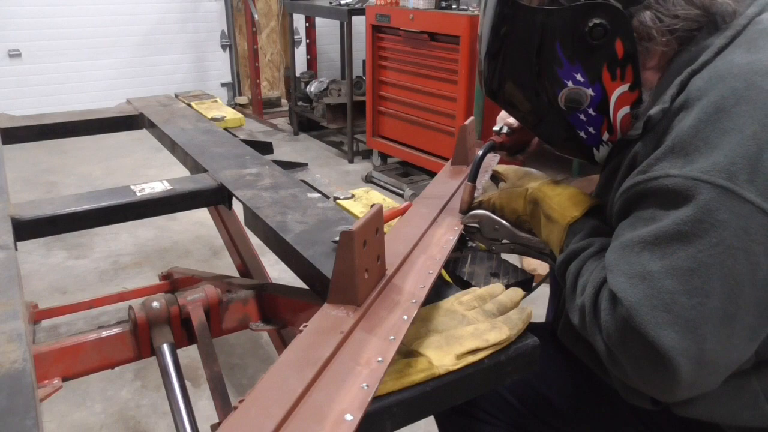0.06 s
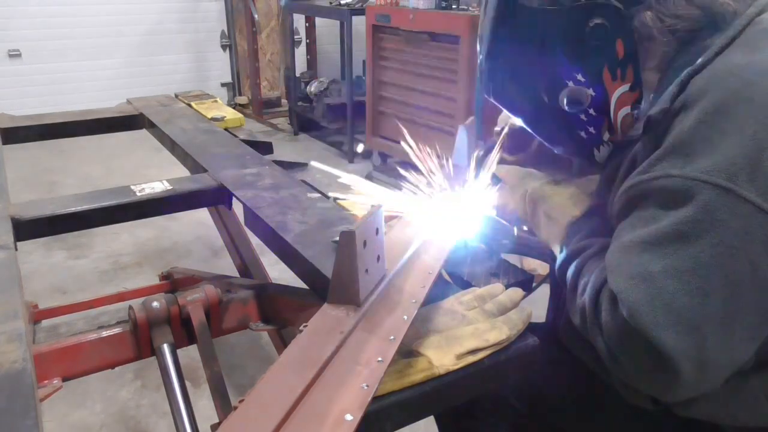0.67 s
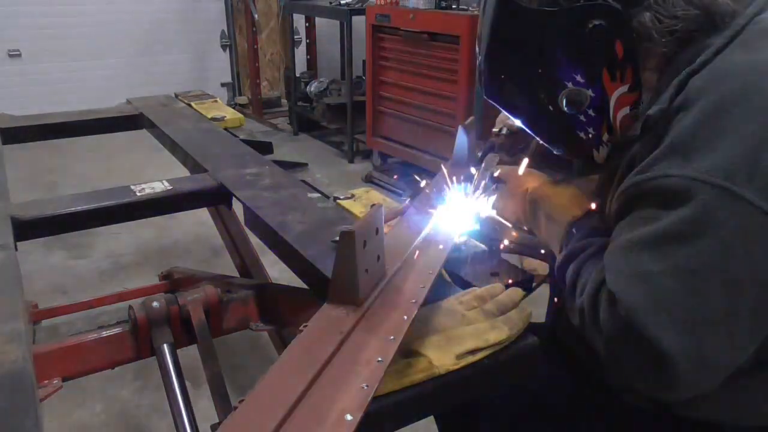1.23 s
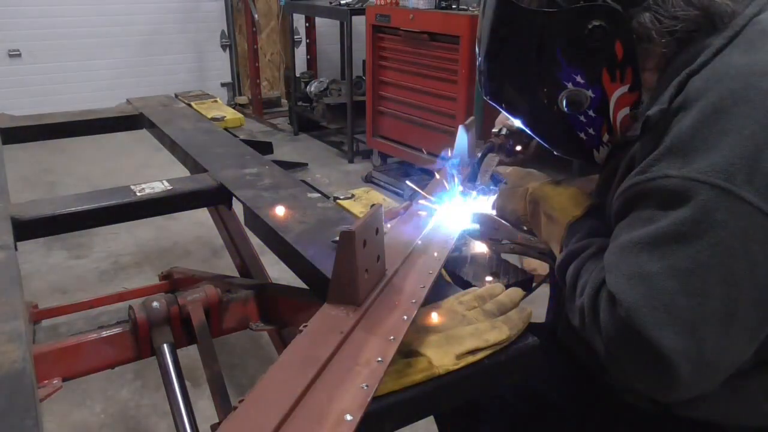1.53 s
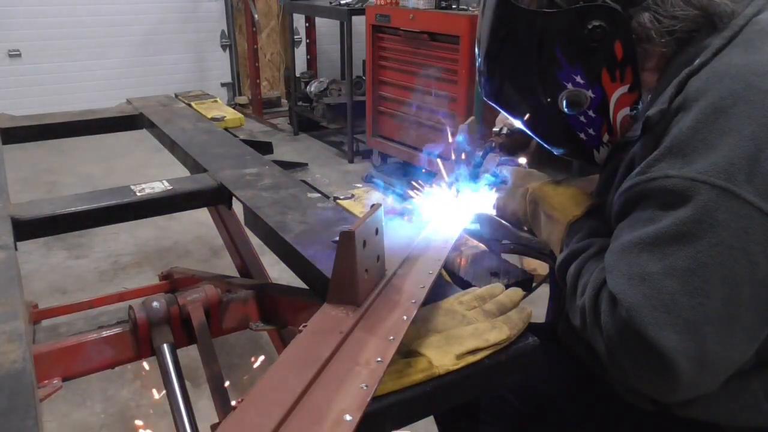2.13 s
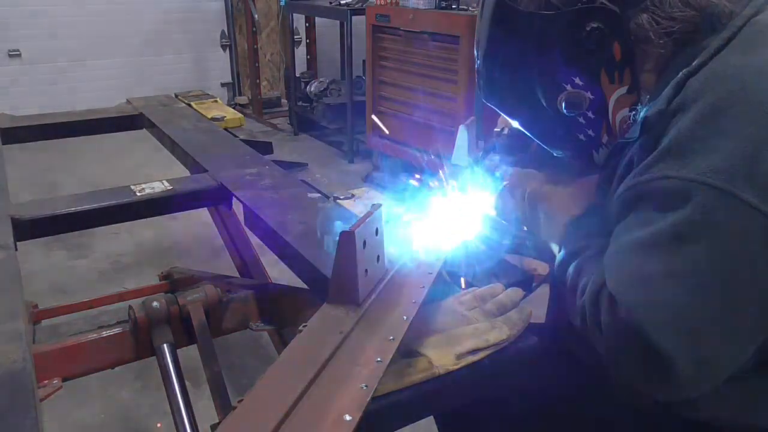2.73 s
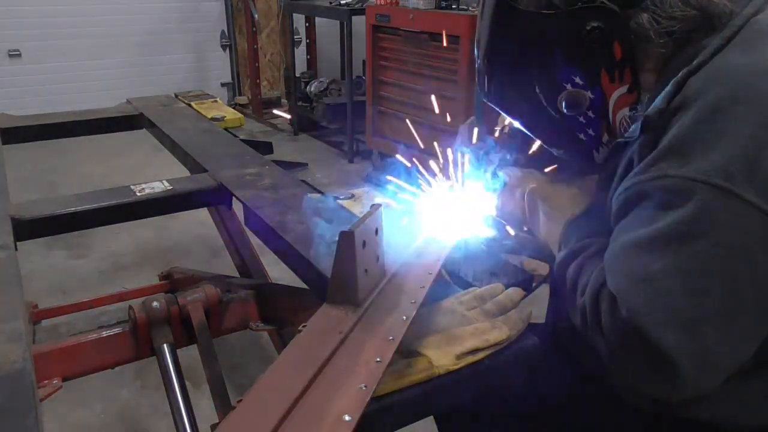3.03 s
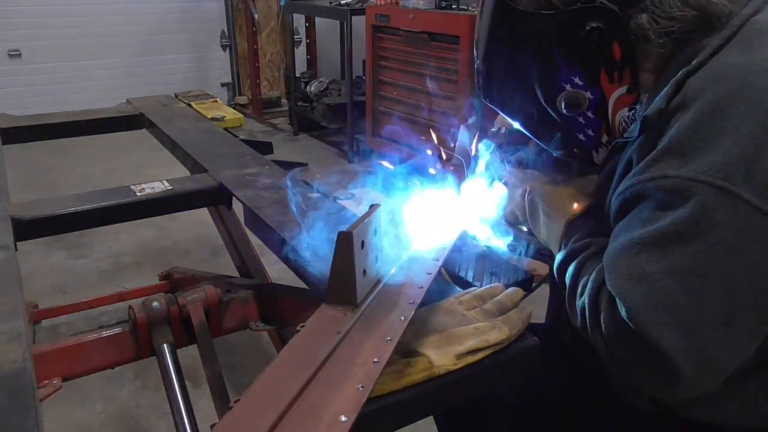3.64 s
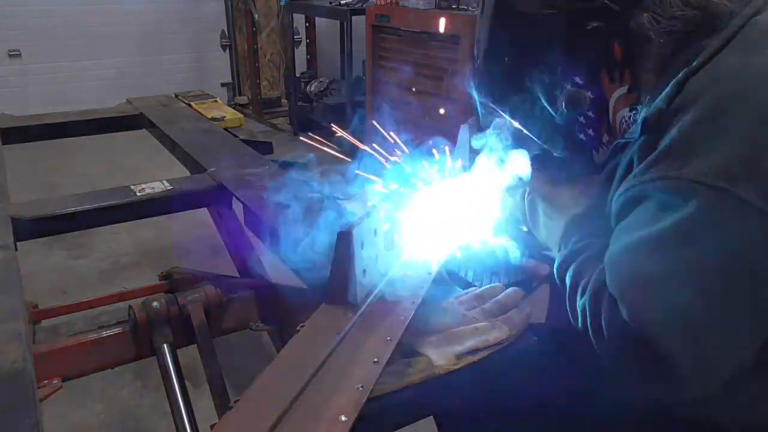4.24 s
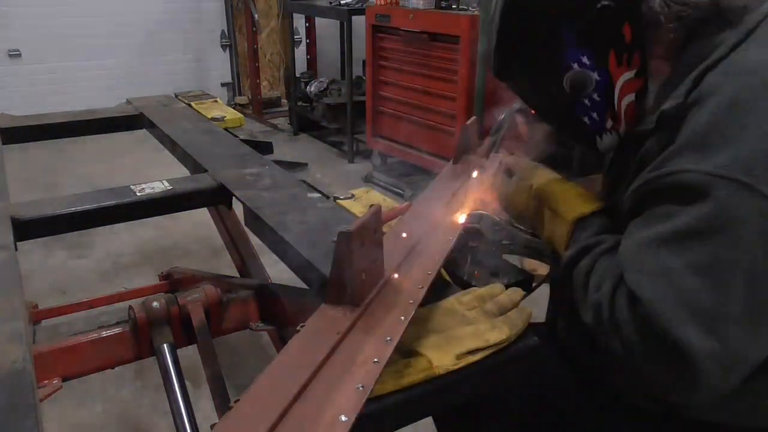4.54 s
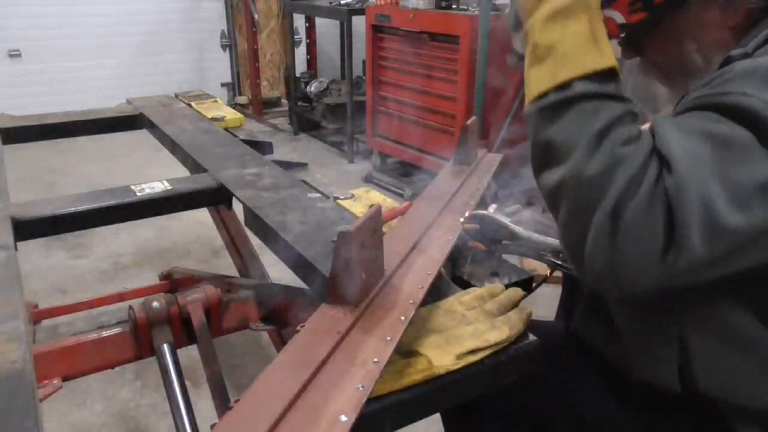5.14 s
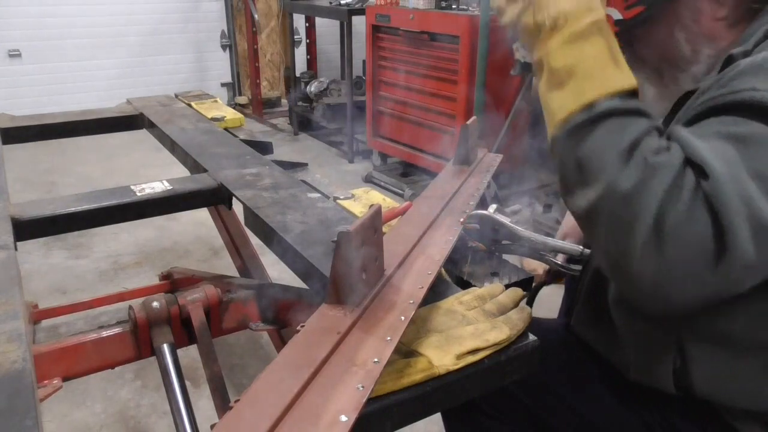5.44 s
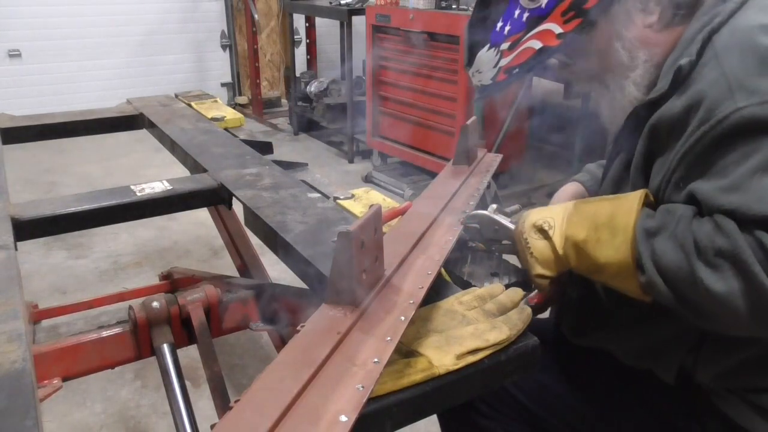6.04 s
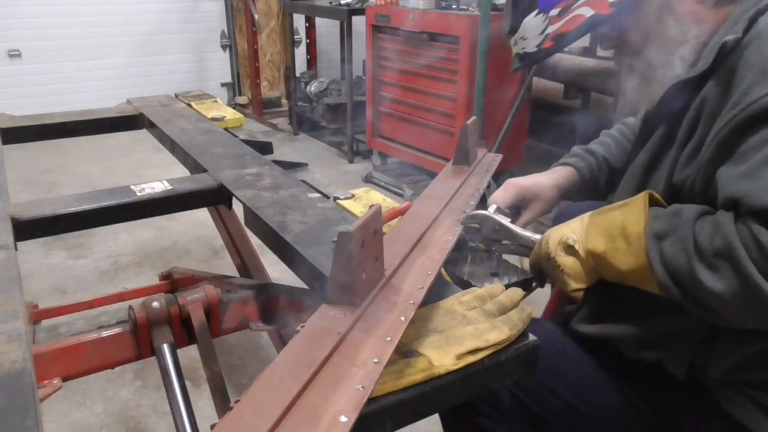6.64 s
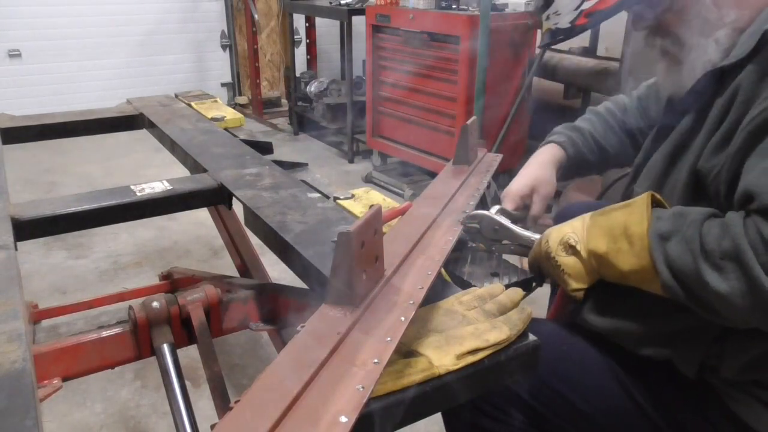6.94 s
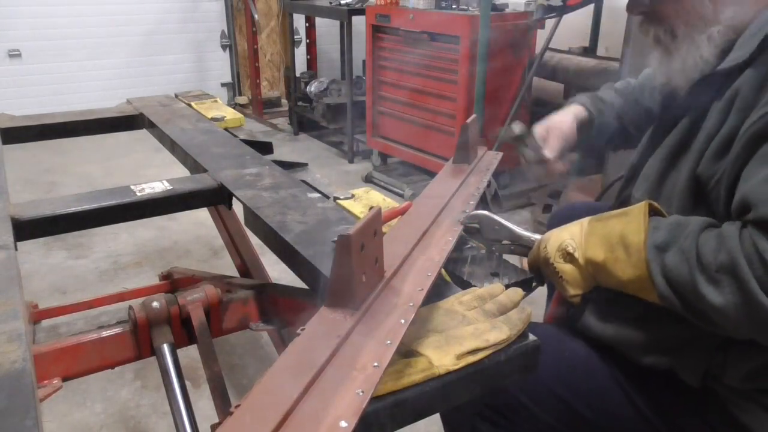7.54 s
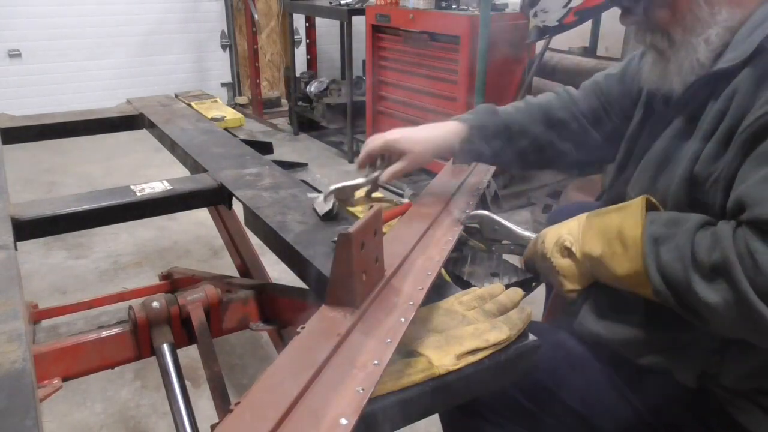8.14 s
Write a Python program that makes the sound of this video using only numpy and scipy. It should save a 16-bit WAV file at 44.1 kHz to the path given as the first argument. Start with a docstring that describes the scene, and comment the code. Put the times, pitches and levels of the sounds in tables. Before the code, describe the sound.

A torch clicks, gas hisses and a welding arc pops and sizzles, then a metal clamp snaps open and clanks down over a fan hum.

```python
"""A fan hums in a workshop; a sleeve rustles, a torch clicks and shielding gas hisses from its nozzle. Close to
the stereo microphone, a wire-feed welder strikes on a steel beam with a few loud pops, then sizzles as the wire
shorts into the pool some 100-200 times a second. Afterwards a locking clamp is snapped open and a wrench is put
down on the steel frame. The recorder's gain ducks under the arc and creeps back."""
import sys
import numpy as np
from scipy import signal
from scipy.fft import rfft, irfft, next_fast_len
from scipy.io import wavfile
from scipy.ndimage import uniform_filter1d

SR = 44100
rng = np.random.default_rng(int(sys.argv[2]) if len(sys.argv) > 2 else 0)


def materialize(psi):
    """Save the field psi as 16-bit PCM at rate SR to the path in sys.argv[1].

    A 1-D psi becomes a single channel; in a 2-D psi each row is a channel.
    """
    bounded = np.clip(np.atleast_2d(psi).T, -1, 1)
    quanta = np.round(bounded * 32767).astype(np.int16)
    wavfile.write(sys.argv[1], SR, quanta)


N = 365588
TIME = np.arange(N) / SR
GRID_HZ = np.maximum(np.fft.rfftfreq(4096, 1 / SR), 1)
SIDES = np.array([[1], [-1]])   # left, right

# Fan and motor lines. Each row: frequency in Hz, rms level in dB, phase wander in radians.
FAN_LINES = [(189.5, -44.5, 1.86), (220.8, -30.5, 0.13), (293.6, -45.5, 1.3), (330.8, -48, 1.2),
             (441, -50, 1.2), (717, -53, 2.7), (897, -57.5, 0.85), (1110, -55, 0.64), (1294, -58.5, 2.2)]
# How alike the room's air is left and right. Each row: frequency in Hz, likeness from 0 to 1.
AIR_LIKENESS = [(30, 0.4), (150, 1), (300, 0.89), (600, 0.7), (1200, 0.5), (3000, 0.64), (8000, 0),
                (15000, 0)]
# Noise spectra. Each row: frequency in Hz, relative level in dB.
AIR_COLOUR = [(25, -36), (70, -32), (105, -13), (130, -13), (180, -0.5), (260, -6.5), (400, -11),
              (600, -11.5), (1250, -18), (1800, -26), (4000, -31.5), (6000, -39), (7700, -35),
              (11000, -40.5), (15500, -51.5)]
CLOTH_COLOUR = [(40, -24.5), (200, 22), (400, 12.5), (1000, 1.5), (2500, -1), (4500, 2.5), (6000, -2),
                (7600, 1), (11000, -11.5), (15000, -26)]
SNAP_COLOUR = [(200, -28), (800, -19.5), (2600, -7.5), (3500, 4), (5000, -0.5), (7400, 1), (8500, 2.5),
               (10200, 1.5), (12000, -3), (14000, -6), (16000, -16.5)]
BOOM_COLOUR = [(20, -51), (100, -18.5), (200, -15), (370, -4.5), (500, 10), (850, -0.5), (1350, -0.5),
               (1750, -5), (2400, -8), (4000, -16), (8000, -41.5)]
GAS_COLOUR = [(300, -27.5), (560, -6.5), (705, 9.5), (920, -14.5), (1150, -0.5), (1400, -4.5), (1600, -1),
              (1850, -10.5), (2800, -15.5), (4500, -4.5), (6500, -8.5), (8300, 8), (9500, -4.5), (11700, 6),
              (13500, -4), (16000, -15)]
WHOOSH_COLOUR = [(300, -24), (750, -12), (980, -6), (1250, -19), (2000, -32), (6000, -45)]
ARC_SPREAD_COLOUR = [(150, -19), (700, -5.5), (1300, -8), (1900, -19.5), (2800, -12), (4000, -7.5),
                     (6000, -7), (7600, 1), (10200, 0.5), (13000, -6), (15500, -12.5)]   # the arc as it spreads in all directions
# Sleeve and glove moving. Each row: middle in seconds, half length in seconds, level in dB.
ARM_MOVES = [(0.217, 0.16, -49.5), (5.452, 0.42, -54.5), (5.645, 0.043, -49.5), (5.98, 0.18, -54),
             (7.102, 0.27, -55), (7.73, 0.075, -47.5)]
# Helmet and torch being handled. Each row: middle in seconds, pitch in Hz, level in dB.
BUMPS = [(5.36, 338, -37), (5.43, 462, -40), (5.635, 346, -39), (5.77, 335, -35.5), (7.30, 458, -40)]
# Modes of the struck parts. Each row: frequency in Hz, level in dB, t60 in seconds.
FRAME_MODES = [(486.3, 6, 0.18), (530, -6.5, .1), (610, -5, 0.25), (749, -2, 0.32), (879, -5.5, 0.1),
               (1110, -3, .15), (1176, -5, .15), (1293, -5.5, .12), (1370, -3, 0.11), (1477, -10, .08),
               (1580, -6, .09), (1890, -16, 0.12), (2420, -13, .14), (2499, -13, 0.18), (3520, -10.5, .17),
               (3828, -13, .2), (3966, -13, .17), (4120, -2.5, 0.092), (4420, -11, .09), (5350, -16, .25)]
TOOL_MODES = [(4200, -19.5, .03), (7300, -8, .012), (7620, -12.5, .028), (9000, 0, .011), (8922, -15, .12),
              (9116, -34, .12), (9900, -6.5, .015), (10594, -17, .2), (11020, -10, .015),
              (12170, -12.5, .018), (12700, -16, .017), (12938, -25, .12), (13000, -14, .15)]
JAW_MODES = [(7160, -14, .1), (7200, 2, 0.014), (7340, -13, .13), (7500, -12, .13), (7420, -14, .1),
             (7820, -1, .012), (7862, -11, .12), (8146, -9, .08), (8508, -13, .1)]
LEVER_MODES = [(526, -15, .08), (654, -11, 0.24), (976, -5.5, 0.14), (1220, 0.5, 0.12), (1355, 5.5, 0.049),
               (1410, -2, .083), (1640, -1, 0.054), (3630, -3, .04), (4900, -11.5, .04), (7200, -12, 0.046),
               (7900, -14, .06)]
SPRING_MODES = [(2660, -16, 0.18), (3057, -1.5, 0.23), (3280, -10, .14), (3670, -1, 0.12),
                (4500, -10, 0.11), (4750, -1, .12), (5566, -9, .14), (6310, 0, 0.23), (7060, -2, 0.15),
                (7500, -2, 0.098), (7640, -4, 0.14), (8478, -8, .11), (9300, -4, .12), (9740, -3, .11),
                (10140, 4, 0.091), (10800, -3, 0.078), (11455, -6, .11)]
TORCH_MODES = [(695, -14.5, 0.18), (1118, -12, .06), (1323, -3.5, 0.044), (1620, 0.5, .09),
               (1810, -7.5, 0.031), (2050, -4, 0.077), (2184, -2.5, 0.05), (2600, -4.5, .05)]
# Hits on those parts. Each row: start in seconds, level in dB.
JAW_CHINKS = [(8.1708, -5.5), (8.178, -6.5), (8.213, -18), (8.254, -27)]
LEVER_KNOCKS = [(6.929, -28.5), (6.938, -43), (6.962, -49)]
SPRING_RELEASES = [(7.137, -34), (7.1407, -30), (7.147, -41)]
TORCH_CLICKS = [(.281, -30), (0.289, -30)]
# The lever under strain. Each row: time in seconds, pitch in Hz, level in dB.
LEVER_GROAN = [(6.98, 328, -70), (7.02, 341, -37), (7.075, 367, -41.5), (7.115, 360, -38), (7.15, 345, -76)]
# Knocks and snaps of steel: the torch valve opening, the clamp, and the tool meeting the frame. Each row: #
# start in seconds, relative levels of boom, frame ring, tool ring and snap in dB, snap t60 in seconds, # lower
# and upper edge of the frame modes moved in Hz.
CONTACTS = [(.281, -35, -35, -50.5, -29, .055, 600, 4000), (5.134, -76, -75, -70, -45, .04, 1500, 4000),
            (6.93, -37.5, -44, -70, -42, 0.038, 600, 4000), (7.137, -34.5, -37, -23, -22, 0.13, 1200, 5000),
            (7.158, -35, -39, -50.5, -49, .17, 500, 3000), (7.498, -78, -70, -35, -58, .041, 1490, 4000),
            (7.516, -73, -70, -29.5, -52, .025, 1490, 4000),
            (8.1027, -18, -17.5, -24, -28, 0.0094, 280, 2980),
            (8.1038, -19, -21, -2, -24, 0.0091, 900, 4800), (8.107, -21, -17.5, -29, -40, .011, 280, 2000),
            (8.122, -29, -24, -19, -19, 0.038, 900, 3000), (8.1705, -21, -22, -0.5, -16, .012, 400, 2500),
            (8.178, -35, -26, -4, -11, .008, 400, 4000), (8.211, -28, -13.5, -11, -10.5, 0.056, 900, 4800),
            (8.2156, -26, -15.5, -22, -23, .04, 910, 4800), (8.226, -34, -28, -30, -28, .03, 900, 2000),
            (8.278, -33, -44, -18, -37, .04, 700, 4000)]
# Hiss and thump with the opening pops. Each row: start in seconds, hiss in dB, its fall in dB a
# second, thump in dB.
OPENING_TAILS = [(0.531, -17.5, 111, -38), (0.747, -15, 38, -27)]
# Lone loud pops. Each row: start in seconds, level in dB, seconds for which the molten drop grows.
LOUD_POPS = [(0.509, -19.5, .0023), (0.5176, -6, .009), (0.5199, -5, .001), (0.5364, 4.5, .018),
             (.7621, 3, 0.0071), (0.8137, 1.5, .03), (.8305, 5.5, .017), (0.8808, 3, .05),
             (.9139, 0.5, .01), (.9243, 3, .011), (0.9358, 2, .011), (.9472, 3, .012), (.9581, 2.5, .011),
             (.9690, 3, .011), (.9788, 4, .009), (1.0114, 2, .004), (1.023, 4, .005), (1.0293, 7, .006),
             (1.0834, 3, .004), (1.096, 5.5, 0.0063), (1.1629, 4, 0.0055), (1.17, 4.5, .006),
             (1.1965, 5.5, 0.0066), (1.2167, 0, .005), (1.252, 1.5, 0.012), (1.2786, -1, 0.027),
             (1.2888, 2.5, .01), (1.3194, -15, .034), (1.3366, -5, .006), (1.3819, -2, 0.0058),
             (1.4023, -2, 0.0046), (1.4656, 3.5, 0.0036), (1.4853, -10, 0.016), (1.5295, 1, .01),
             (1.5417, 1.5, .006), (1.5744, -1.5, 0.0054), (1.638, 1, 0.025), (1.6823, -1, 0.0044),
             (1.7106, -0.5, 0.0051), (1.745, 1.5, 0.0042), (1.768, -1, 0.0045), (1.8337, -1, .005),
             (1.8682, 1, .014), (1.8903, 1.5, 0.0066), (1.946, -1, .006), (1.951, 3, .005),
             (1.9946, 0.5, 0.0052), (2.1126, -1.5, 0.0046), (2.1679, -1, .005), (2.2433, -3.5, .005),
             (2.2513, 0, .005), (2.3369, -6, 0.0056), (2.4386, -8, 0.0043), (2.48, -4.5, .006),
             (2.4972, -6, .006), (2.559, -3.5, .005), (2.5909, -1.5, .006), (2.666, 0, 0.018),
             (2.6749, -2, 0.005), (2.7135, -2, .007), (2.8025, -3, .006), (2.8192, 0, .007),
             (2.885, -1.5, 0.0094), (2.9126, 0, .008), (2.9712, -2, .008), (3.003, -3, 0.011),
             (3.0407, -0.5, .044), (3.0722, -9, .04), (3.0902, -9, .002), (3.0934, -0.5, .0027),
             (3.125, -1, .019), (3.145, -5, .006), (3.1554, -10, .006), (3.1637, -2, 0.0046),
             (3.1725, -3, 0.0051), (3.1812, -3, .004), (3.1957, -2.5, 0.01), (3.2207, -12, .006),
             (3.2506, -4, 0.0082), (3.2652, -6, 0.0067), (3.3049, -6, 0.0092), (3.3195, -2.5, .012),
             (3.368, -3, .0027), (3.4226, -4, .005), (3.4535, -3.5, .006), (3.514, -1.5, .005),
             (3.6161, -3, 0.016), (3.7228, -3, 0.0055), (3.8473, -9, .008), (3.8886, -3, .012),
             (3.9062, -3, 0.014), (3.9363, -6, .01), (3.9631, -4, 0.022), (3.9867, -2.5, 0.017),
             (4.016, 3, 0.0086), (4.0396, 3, 0.0082), (4.146, -6.5, 0.0043), (4.181, -3, 0.0089),
             (4.2073, -4.5, 0.012), (4.222, -6, .014), (4.235, -5, .013), (4.2722, -11, .037),
             (4.2817, -10, .009), (4.2848, -5.5, .003), (4.2961, -3, .01), (4.3089, -2, .01),
             (4.3228, -4.5, .01), (4.3373, -1, .012), (4.3513, 1.5, .012)]
# The wire dipping into the pool. Each row: time in seconds, short circuits a second.
DIP_PACE = [(.95, 180), (1.17, 160), (1.3, 130), (1.4, 175), (1.53, 135), (1.72, 185), (2.1, 215),
            (2.5, 200), (2.62, 160), (2.82, 165), (3.04, 125), (3.15, 135), (3.35, 115), (3.55, 190),
            (3.8, 170), (3.95, 130), (4.14, 155), (4.3, 115)]
# The torch along the joint. Each row: time in seconds, arc level in dB, lift of its low peaks in dB.
TORCH_TRAVEL = [(.9, -1, 1.5), (1.15, -1, 1), (1.35, -4.5, 0.5), (1.9, -8.5, -0.5), (2.5, -11, 1.5),
                (3.0, -7.5, 0), (3.16, -2.5, 2), (3.3, -9, 3), (3.5, -8, 1), (3.75, -9.5, 2),
                (4.05, -7.5, 1.5), (4.35, -14, 1.5)]
# Resonances of nozzle, beam and microphone. Each row: frequency in Hz, width in Hz, relative level
# in dB at the start of the bead and at its end.
ARC_PEAKS = [(440, 1200, -22.5, -17.5), (1295, 520, -12.5, -11), (2200, 620, -20, -21.5),
             (3770, 930, -15.5, -17), (4650, 1730, -15.5, -18), (7140, 520, -3.5, -7.5),
             (7810, 750, 0.5, 0), (8470, 630, -2, -0.5), (10080, 700, 2, -0.5), (10730, 750, 2.5, -0.5),
             (11650, 700, -16, 0), (12680, 860, 4, 5), (13400, 1000, -4.5, 0), (14340, 1600, -3.5, 1),
             (15500, 1900, -15.5, -15)]
# Stereo lean of the arc's treble. Each row: frequency in Hz, left minus right in dB.
ARC_BALANCE = [(6000, 0), (6800, -1.8), (7700, 0), (9300, .5), (10200, -6), (11200, -3), (12200, -1.5),
               (13100, 0), (13900, -1.7), (15500, 3.5)]
# The arc's arrival at the microphone. Each row: frequency in Hz, lead of the left side in radians.
ARC_LEAD = [(300, 0), (4000, 0), (6400, -.3), (7000, -.1), (8500, -.35), (9250, 1.9), (10000, 0),
            (13500, -.15), (14600, .15)]

SETTLED_S, FALTERS_S, OUT_S = .91, 4.2, 4.355   # the arc settles into short circuits, falters, goes out


def from_db(db):
    """Decibels to gain."""
    return 10 ** (np.asarray(db) / 20)


def in_time(rows):
    """The columns of a curve at every sample."""
    times, *columns = np.transpose(rows)
    return [np.interp(TIME, times, column) for column in columns]


def at_hz(points, hz=GRID_HZ):
    """Read a spectrum on a log-frequency axis."""
    knots_hz, values = np.transpose(points)
    return np.interp(np.log(hz), np.log(knots_hz), values)


def swell(middle_s, half_s, t=TIME):
    """A bell curve that peaks at 1."""
    return np.exp(-((t - middle_s) / half_s) ** 2)


def drift(per_s):
    """Random wander with a spread of about 1."""
    knots = rng.standard_normal(int(per_s * N / SR) + 2)
    return np.interp(TIME * per_s, np.arange(len(knots)), knots)


def add(track, s, sound):
    """Mix a sound into a track at time s."""
    i = int(np.clip(round(s * SR), 0, N - 1))
    track[..., i:i + sound.shape[-1]] += sound[..., :N - i]


def colour(x, gain):
    """Minimum-phase filter with this gain curve, scaled to unit energy."""
    cepstrum = irfft(np.log(gain + 1e-6))
    half = len(cepstrum) // 2
    cepstrum[1:half] *= 2
    cepstrum[half + 1:] = 0
    impulse = irfft(np.exp(rfft(cepstrum)))[:half]
    return signal.oaconvolve(x, impulse / np.linalg.norm(impulse))[:N]


def tint(pair, gain):
    """The same colour on both channels."""
    return np.array([colour(channel, gain) for channel in pair])


def high_pass(x, hz):
    """Second-order bass cut."""
    return signal.sosfilt(signal.butter(2, hz, "high", fs=SR, output="sos"), x)


def noise(spectrum):
    """Coloured noise of rms 1."""
    return colour(rng.standard_normal(N), from_db(at_hz(spectrum)))


def stereo_noise(spectrum, width):
    """Coloured noise; width is the part that differs left and right."""
    return noise(spectrum) + width * noise(spectrum) * SIDES


def burst(t60, width, size=1024):
    """Stereo white noise that falls 60 dB in t60 seconds."""
    mid, side = rng.standard_normal((2, size))
    return (mid + width * side * SIDES) * from_db(-60 * np.arange(size) / SR / t60)


def struck(modes, hits, scatter_db, pan_db, lowest_hz=0, highest_hz=SR, travel_s=.001):
    """Each hit rings every mode with its own strength; soft blows miss the highs, light ones the lows."""
    out = np.zeros((2, N))
    times, hits_db = np.transpose(hits)
    starts = (times * SR).astype(int)
    for hz, db, t60 in modes:
        delay = int(rng.random() * travel_s * SR)   # each mode takes its own path to the microphone
        strengths = from_db(hits_db + db + scatter_db * rng.standard_normal(len(starts)))
        rolloff = 1 + (hz / highest_hz) ** 4 + (lowest_hz / hz) ** 4
        clicks = np.full(N, 1e-18)
        clicks[np.minimum(starts + delay, N - 1)] = strengths / rolloff
        radius, angle = from_db(-60 / (t60 * SR)), 2 * np.pi * hz / SR
        ring = signal.lfilter([0, np.sin(angle)], [1, -2 * radius * np.cos(angle), radius ** 2], clicks)
        out += ring * from_db(pan_db * rng.standard_normal() * SIDES)
    return out


def sink(db, db_per_s):
    """Follow every rise at once, fall no faster than this."""
    return np.maximum.accumulate(db + db_per_s * TIME) - db_per_s * TIME


def lag(x, seconds):
    """One-pole smoothing."""
    pole = np.exp(-1 / (seconds * SR))
    return signal.lfilter([1 - pole], [1, -pole], x)


def fan(air_db=-37.5, waver_db=2.0, side_radians=0.16):
    """Room tone: a steady hum with weaker, less steady lines, in the rush of moving air."""
    hum = 0
    for hz, db, wander in FAN_LINES:
        phase = 2 * np.pi * hz * TIME + wander * drift(14)
        rms = from_db(db + waver_db * min(wander, 1) * drift(7.7))
        hum = hum + rms * np.sqrt(2) * np.sin(phase - side_radians * SIDES)
    size = next_fast_len(N)
    bins_hz = np.maximum(np.fft.rfftfreq(size, 1 / SR), 1)
    alike = np.clip(at_hz(AIR_LIKENESS, bins_hz), 0, 1)
    mid, side = rfft(rng.standard_normal((2, size))) * from_db(at_hz(AIR_COLOUR, bins_hz))
    air = irfft(np.sqrt(1 + alike) * mid + np.sqrt(1 - alike) * side * SIDES)[:, :N]
    return hum * from_db(-.7 * SIDES) + from_db(air_db) * air / np.sqrt(np.mean(air ** 2))


def echoes(pair, decay, apart_hz=4500):
    """Reflections as decaying noise of unit energy; left and right share the lows, not the treble."""
    mid, side = rng.standard_normal((2, SR))
    tails = [decay(white, np.arange(SR) / SR) for white in mid + high_pass(side, apart_hz) * SIDES]
    return np.array([signal.oaconvolve(channel, tail / np.linalg.norm(tail))[:N]
                     for channel, tail in zip(pair, tails)])


def workshop(pair, tail_db=-8.0, split_hz=6000, low_t60=0.54, treble_t60=0.4):
    """The room's tail, whose treble dies first."""
    low_pass = signal.butter(2, split_hz, fs=SR, output="sos")

    def decay(white, t):
        low = signal.sosfiltfilt(low_pass, white)
        tail = low * from_db(-60 * t / low_t60) + (white - low) * from_db(-60 * t / treble_t60)
        return tail * (t > .005)
    return from_db(tail_db) * echoes(pair, decay)


def near_reflections(pair, db=-7.0, t60=0.029):
    """Quick reflections from the beam and the welder, close by."""
    return from_db(db) * echoes(pair, lambda white, t: white * from_db(-60 * t / t60) * (t > .0008))


def clothing():
    """Each movement of the arm is a rustle that swells and fades."""
    power = sum(from_db(db) ** 2 * swell(s, half_s) for s, half_s, db in ARM_MOVES)
    return np.sqrt(power) * stereo_noise(CLOTH_COLOUR, width=0.93)


def bumps(half_s=0.031):
    """Each soft bump of helmet or torch is a brief hollow tone."""
    return sum(from_db(db) * swell(s, half_s) * np.sqrt(2) * np.sin(2 * np.pi * hz * TIME)
               for s, hz, db in BUMPS)


def clamp_opening():
    """The lever knocks as the hand takes hold, groans as it is pressed, and the spring lets go."""
    hz, db = in_time(LEVER_GROAN)
    pressed = (TIME > LEVER_GROAN[0][0]) & (TIME < LEVER_GROAN[-1][0])
    groan = pressed * from_db(db) * np.sqrt(2) * np.sin(2 * np.pi * np.cumsum(hz) / SR)
    lever = struck(LEVER_MODES, LEVER_KNOCKS, scatter_db=3.5, pan_db=-2.0)
    spring = struck(SPRING_MODES, SPRING_RELEASES, scatter_db=2.0, pan_db=-1.0)
    return lever + groan + spring


def clinks(boom_lift_db=6.0, jangle_db=-24, tool_trim_db=-1.0):
    """Steel on steel: a snap, the frame's boom and ring, the tool's jangle, jaws chinking on a bounce."""
    boom, snap = np.zeros((2, 2, N))
    for s, boom_db, _, ring_db, snap_db, snap_t60, _, _ in CONTACTS:
        add(boom, s, from_db(boom_db + boom_lift_db) * burst(t60=0.22, width=0.089, size=SR))
        add(snap, s, from_db(snap_db) * burst(snap_t60, width=0.25, size=SR))
        add(snap, s, from_db(ring_db + jangle_db) * burst(t60=0.56, width=0.25, size=SR))
    times, _, frame_db, tool_db, _, _, lowest_hz, highest_hz = np.transpose(CONTACTS)
    frame = struck(FRAME_MODES, np.c_[times, frame_db], scatter_db=1.5, pan_db=3.0,
                   lowest_hz=lowest_hz, highest_hz=highest_hz, travel_s=.005)
    frame = high_pass(frame, hz=280)   # the frame's ring carries no bass
    tool = struck(TOOL_MODES, np.c_[times, tool_db + tool_trim_db], scatter_db=3.5, pan_db=0.5)
    jaws = struck(JAW_MODES, JAW_CHINKS, scatter_db=1.0, pan_db=1.5)
    snap = tint(snap, from_db(at_hz(SNAP_COLOUR)))
    boom = tint(boom, from_db(at_hz(BOOM_COLOUR)))
    return snap + boom + frame + tool + jaws


def trigger():
    """The torch clicks twice as trigger and wire feed engage."""
    return struck(TORCH_MODES, TORCH_CLICKS, scatter_db=2.0, pan_db=2.0)


def gas(open_s=.28, shut_s=4.31, attack_s=.0015, surge_s=.21, surge_db=-24.5, flow_db=-33.5):
    """Pressure stored in the hose escapes in a surge, then the nozzle hisses until the valve shuts."""
    age = np.maximum(TIME - open_s, 0)
    open_db = flow_db + (surge_db - flow_db) * np.exp(-age / surge_s)
    release_db = 193 * np.maximum(TIME - shut_s, 0)   # 193 dB a second
    gain = np.minimum(age / attack_s, 1) * from_db(open_db - release_db)
    return gain * stereo_noise(GAS_COLOUR, width=0.15)


def whoosh(middle_s=3.325, half_s=.035, db=-30):
    """A short hollow whoosh from the boiling pool."""
    return from_db(db) * swell(middle_s, half_s) * noise(WHOOSH_COLOUR)


def thumps(top_hz=450):
    """A dull low thump goes with the opening pops."""
    out = np.full((2, N), 1e-18)
    for s, _, _, db in OPENING_TAILS:
        add(out, s, from_db(db) * burst(t60=0.16, width=0.35, size=8192))
    return tint(out, 1 / (1 + (GRID_HZ / top_hz) ** 2))


def fading_hiss(attack_s=0.0019):
    """A bright hiss dies away after the first loud pops; another fades as the arc catches."""
    gain = 0
    for s, db, fall_db_per_s, _ in OPENING_TAILS:
        age = np.maximum(TIME - s, 0)
        gain = gain + np.minimum(age / attack_s, 1) * from_db(db - fall_db_per_s * age)
    return gain * (TIME < SETTLED_S) * stereo_noise(ARC_SPREAD_COLOUR, width=0.35)


def pop(s, sputter, width, stretch=1, spike=3.84, crack_t60=0.0024, sputter_t60=0.013):
    """The wire's molten bridge bursts: a pressure spike, a short crack, then sputter."""
    boil = 1 + 2.6 * swell(middle_s=3.29, half_s=0.17, t=s)   # cracks last longer while the pool boils
    out = burst(crack_t60 * boil * stretch, width) + sputter * burst(sputter_t60, width)
    out[:, 0] = spike
    return out / np.linalg.norm(out[0]) * np.sqrt(SR / 1000)   # the energy of 1 ms at rms 1


def short_circuits(lift_db=1.0, spread_db=1.7, jitter=.2, width=0.097,
                   hiss_db=-16.0, hiss_db_per_octave=13, stall_db=-5, flutter_db=3.5):
    """Cracks come unevenly and pause while a big drop grows; the plasma hisses more at a quicker pace."""
    per_s, = in_time(DIP_PACE)
    level_db, _ = in_time(TORCH_TRAVEL)
    cracks = np.zeros((2, N))
    dipping = TIME < FALTERS_S
    for s, db, growth_s in LOUD_POPS:
        stretch = from_db(0.31 * max(db, 0))   # big drops take longer to burst
        add(cracks, s, from_db(db + lift_db) * pop(s, sputter=0.125, width=width, stretch=stretch))
        dipping[int((s - .8 * growth_s) * SR):int((s + .003) * SR)] = False
    s = SETTLED_S
    for gap, size, spatter in rng.standard_normal((650, 3)):
        i = int(min(s, OUT_S) * SR)
        crack = pop(s, sputter=0.25 * np.exp(spatter / 2), width=width)
        if dipping[i]:
            add(cracks, s, from_db(level_db[i] + lift_db + spread_db * np.clip(size, -2, 2)) * crack)
        s += np.exp(jitter * gap) / per_s[i]
    pace_db = hiss_db_per_octave * np.log2(per_s / np.mean(per_s))
    plasma_db = level_db + hiss_db + pace_db + stall_db * ~dipping + flutter_db * drift(400)
    burning = (TIME >= SETTLED_S) & (TIME < OUT_S)
    return cracks, burning * from_db(plasma_db) * burst(np.inf, width, size=N)


def resonances(peaks):
    """Gain curve of a set of broad peaks."""
    gains = [from_db(db) / (1 + (2 * (GRID_HZ - hz) / width) ** 2) for hz, width, db in peaks]
    return np.sqrt(sum(gain ** 2 for gain in gains))


def arc(cracks, plasma, low_db=-16.5, low_hiss_db=5.5, low_cut_hz=150):
    """The arc heard directly, coloured by nozzle and beam; the colour shifts as the torch travels."""
    _, fullness_db = in_time(TORCH_TRAVEL)
    travel = np.clip((TIME - SETTLED_S) / (OUT_S - SETTLED_S), 0, 1)
    lean = from_db(at_hz(ARC_BALANCE) / 2)
    left, right = cracks + plasma
    # the plasma is duller than the cracks
    low_drive = from_db(low_db + fullness_db) * (cracks + from_db(low_hiss_db) * plasma)
    out = 0
    for column, share in enumerate((1 - travel, travel)):
        peaks = [(hz, width, db[column]) for hz, width, *db in ARC_PEAKS]
        body = resonances(peaks[:5]) / (1 + (low_cut_hz / GRID_HZ) ** 2)   # a small arc has little bass
        bright = resonances(peaks[5:])
        treble = np.array([colour(left, bright * lean), colour(right, bright / lean)])
        out = out + share * (tint(low_drive, body) + treble * from_db(-.8 * SIDES))
    return out


def at_microphone(pair):
    """The arc reaches the two sides of the microphone slightly out of step."""
    size = next_fast_len(N)
    lead = np.interp(np.fft.rfftfreq(size, 1 / SR), *np.transpose(ARC_LEAD))
    return irfft(rfft(pair, size) * np.exp(.5j * lead * SIDES), size)[:, :N]


def scene(arc_room_db=-3.5):
    """Torch and tools sound close by and echo in the room; clothing, bumps and fan are added dry."""
    cracks, plasma = short_circuits()
    torch_and_tools = fading_hiss() + thumps() + whoosh() + gas() + trigger() + clamp_opening() + clinks()
    direct = at_microphone(arc(cracks, plasma)) + torch_and_tools
    arc_spread = from_db(arc_room_db) * tint(cracks + plasma, from_db(at_hz(ARC_SPREAD_COLOUR)))
    into_room = arc_spread + torch_and_tools
    return direct + near_reflections(into_room) + workshop(into_room) + clothing() + bumps() + fan()


def record(dry, threshold_db=-21.5, slope=0.82, attack_s=0.0029, cutoff_hz=16000):
    """The recorder's gain ducks on a peak, returning fast after a lone one, slowly after long noise."""
    power = np.abs(uniform_filter1d(np.mean(dry ** 2, axis=0), size=44))
    over_db = np.maximum(10 * np.log10(power + 1e-12) - threshold_db, 0)
    quick_db = sink(slope * over_db, db_per_s=52.0)
    slow_db = sink(lag(quick_db, seconds=0.3), db_per_s=14.0)
    duck_db = lag(np.maximum(quick_db, slow_db), attack_s)
    rounded = np.tanh(dry * from_db(-duck_db))
    return signal.sosfilt(signal.ellip(10, .1, 80, cutoff_hz, fs=SR, output="sos"), rounded)


dry = scene()
out = record(dry)
materialize(out)
```